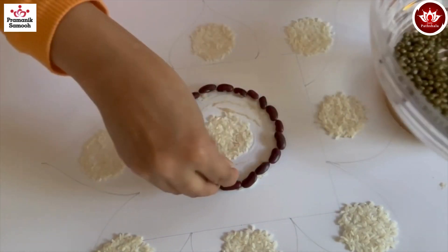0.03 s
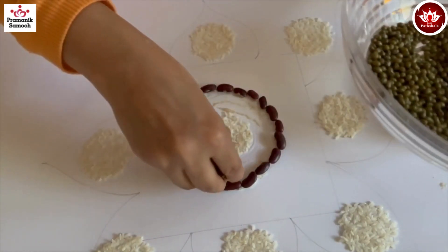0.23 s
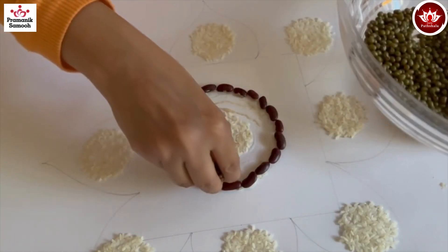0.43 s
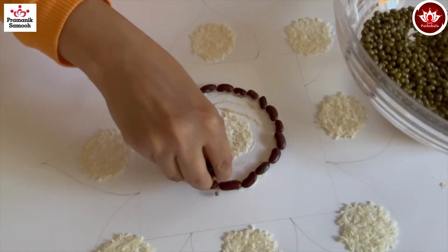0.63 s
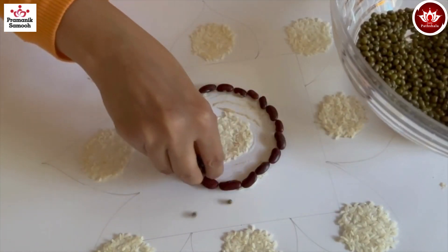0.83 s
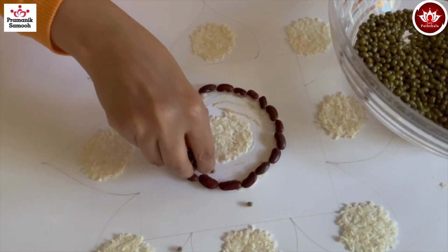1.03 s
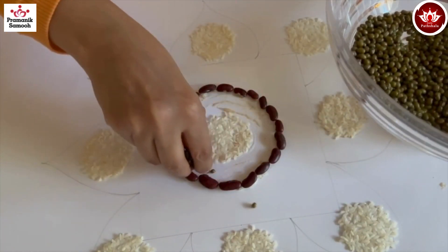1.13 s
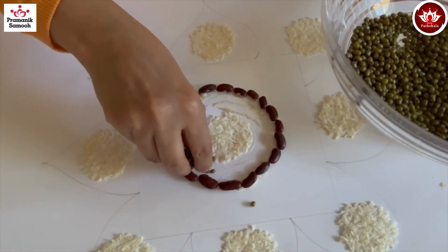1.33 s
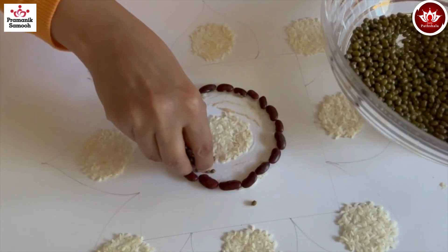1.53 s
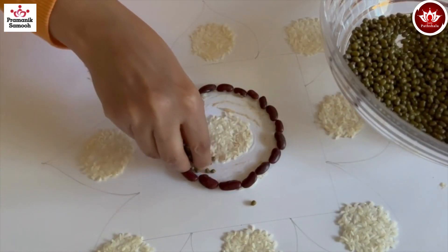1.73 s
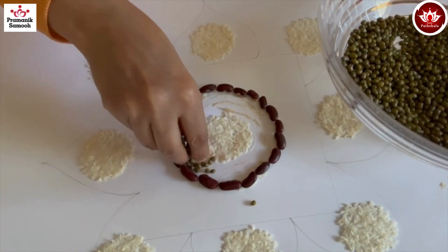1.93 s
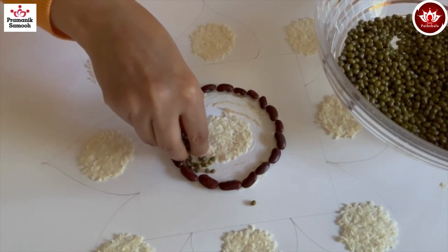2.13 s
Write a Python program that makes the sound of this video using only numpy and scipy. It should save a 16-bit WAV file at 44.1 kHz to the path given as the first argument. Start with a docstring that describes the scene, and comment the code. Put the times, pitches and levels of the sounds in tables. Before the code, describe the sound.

Dried beans rustle in a glass bowl as a hand scoops, then drop clicking onto a board

```python
"""A hand scoops dried beans in a glass bowl: they slide over one another in a swelling hiss, then settle.
Single beans then fall from the fingers onto a board, where they knock, bounce and click against their neighbours.
A small room with a low rumble."""
import sys
import numpy as np
from scipy import signal
from scipy.fft import rfft, irfft
from scipy.io import wavfile

SR = 44100
rng = np.random.default_rng(int(sys.argv[2]) if len(sys.argv) > 2 else 0)


def store_pcm(level_fs):
    """Save levels as 16-bit WAV."""
    pcm = np.round(np.clip(level_fs, -1, 1) * 32767).astype(np.int16)
    wavfile.write(sys.argv[1], SR, np.atleast_2d(pcm).T)


N = 97020

# how hard the beans slide in the bowl: (s, dB)
SLIDE = [(0, -44), (0.085, -57), (0.15, -41), (0.21, -41), (0.25, -37), (0.295, -28), (0.32, -35), (0.36, -26), (0.44, -30), (0.485, -22.5), (0.585, -21.5), (0.63, -28.5), (0.685, -33), (0.72, -31), (0.775, -37), (0.82, -32), (0.87, -46), (1.1, -90)]  # fixed
# how much the beans then shift against each other: (s, dB)
SHIFT = [(0.84, -58), (0.9, -32.5), (0.94, -43), (0.965, -38), (1.03, -35.5), (1.09, -50), (1.14, -37.5), (1.27, -36.5), (1.3, -42), (1.35, -32), (1.44, -39.5), (1.5, -50.5), (1.74, -42.5), (1.79, -34.5), (1.84, -68.5), (1.93, -63), (1.99, -38.5), (2.08, -72)]
# colour of rubbing beans: (Hz, dB per Hz)
SLIDE_COLOUR = [(150, -56), (400, -34), (1000, -22.5), (2000, -21.5), (3000, -13.5), (4500, -15), (6000, -11.5), (9700, -10), (11000, -2), (11600, 3), (12400, 2), (13000, 2), (13700, 3.5), (15600, -4), (16300, -54)]
SLIDE_DB, SLIDE_GRAINS_PER_S = -1, 3500  # grain rate at the height of the scoop
SHIFT_GRAINS_PER_S = 450  # fixed
GRAIN_SPREAD, CROWDING = 1.1, .5  # spread of grain sizes; how fast the rate falls with level
GRAIN_T60_S, GRAIN_SNAP = .007, 4.0  # fixed
CLUMP_DB, CLUMPS_PER_S = 1.5, 110  # beans slip in little bunches
# level of the bowl's ring: (s, dB)
BOWL = [(0, -63), (0.08, -71), (0.17, -61), (0.3, -54), (0.55, -51), (0.8, -72), (1.1, -110)]  # fixed
BOWL_HZ, BOWL_WIDTH_HZ = 3170, 270  # fixed
# a bean lands on the board: (s, click dB, knock dB)
DROPS = [(0.8358, -22.0, -40.0), (0.8689, -27.0, -45.0), (0.9658, -26.0, -38.0), (0.9734, -30.0, -37.0),
         (0.9935, -26.0, -39.0), (1.046, -17.0, -30.0), (1.1006, -12.0, -30.0), (1.1477, -21.0, -40.0),
         (1.176, -9.0, -24.0), (1.1819, -24.0, -39.0), (1.2357, -21.0, -33.0), (1.2562, -12.0, -31.0),
         (1.2634, -25.0, -38.0), (1.3089, -17.0, -34.0), (1.4269, -37.0, -39.0), (1.4332, -16.0, -32.0),
         (1.4471, -21.0, -38.0), (1.5463, -19.0, -28.0), (1.5735, -27.0, -44.0), (1.6078, -12.0, -32.0),
         (1.7188, -10.0, -30.0), (1.747, -10.0, -31.0), (1.7506, -17.0, -33.0), (1.7951, -28.0, -41.0),
         (1.8969, -19.0, -39.0), (1.9054, -20.0, -38.0), (1.9287, -17.0, -38.0), (1.9808, -27.0, -37.0)]  # fixed
# a bean clicks against another: (s, dB)
TICKS = [(0.03, -36.0), (0.1036, -35.0), (0.1277, -26.0), (0.1429, -31.0), (0.1539, -31.0), (0.1934, -30.0),
         (0.2015, -32.0), (0.2243, -26.0), (0.3323, -20.0), (0.3568, -19.0), (0.3992, -12.0), (0.4293, -12.0),
         (0.4619, -14.0), (0.6366, -18.0), (0.6556, -19.0), (0.6649, -18.0), (0.6984, -18.0), (0.7489, -20.0),
         (0.7654, -21.0), (0.7906, -21.0), (0.8229, -23.0), (0.8908, -17.0), (0.9025, -24.0), (0.9417, -27.0),
         (0.9588, -21.0), (1.006, -25.0), (1.022, -25.0), (1.0692, -25.0), (1.1583, -24.0), (1.211, -21.0),
         (1.2186, -18.0), (1.2724, -26.0), (1.2806, -25.0), (1.363, -22.0), (1.37, -21.0), (1.4061, -22.0),
         (1.4198, -26.0), (1.6201, -27.0), (1.8939, -21.0), (1.9455, -25.0), (1.9642, -29.0), (2.0212, -33.0)]  # fixed
# colours of the hard shell's click and of the board's knock: (Hz, dB per Hz)
CLICK_COLOUR = [(500, -55.5), (2000, -27), (4000, -18.5), (7200, -19.5), (7700, -15), (11000, -9.5), (11600, -1), (15300, -1.5), (16400, -32)]
KNOCK_COLOUR = [(150, -20), (450, -23), (800, -8), (1200, -3.5), (2000, 0), (3200, 7.5), (3800, -0.5), (5500, -1), (8000, -22)]
# colour of one bean on another, thinner than a landing: (Hz, dB per Hz)
TICK_COLOUR = [(500, -56), (2000, -30.5), (4000, -22), (7500, -17), (10000, -11.5), (11600, -0.5), (15300, -1.5), (16400, -17.5)]
DROP_DB, KNOCK_DB = 0.5, 1.5
TICK_DB, TICK_T60_S = 0.3, .006  # fixed
CLICK_T60_S, KNOCK_T60_S = .011, .012  # fixed
# first touch against the chatter after it
CLICK_SNAP, KNOCK_SNAP = 5.0, 13.0  # fixed
# one soft, dull bump: a few cycles that swell and fade
BUMP_S, BUMP_HZ, BUMP_WIDTH_S, BUMP_DB = .679, 546, 0.00096, -40
ROOM_T60_S, ROOM_GAP_S = .28, .004  # fixed
CLICK_ROOM_DB, KNOCK_ROOM_DB, TICK_ROOM_DB = -8.5, -10.5, -8  # fixed
SLIDE_ROOM_DB = -6.5
ECHOES_PER_S, ECHO_UNEVEN_DB = 350, 1  # reflections arrive in bunches
# the rumble eases off: (s, dB)
RUMBLE = [(0, -64.5), (0.3, -63.5), (0.8, -66.5), (1.4, -70), (2.2, -71)]
# colours of the rumble and of the faint hiss: (Hz, dB per Hz)
RUMBLE_COLOUR = [(20, -26), (40, -10), (65, 0), (100, 5.5), (125, 1), (190, -11.5), (400, -17), (1500, -34)]
FLOOR_COLOUR = [(100, 2.5), (400, 4.5), (1000, -1), (5000, 1), (15000, -8)]
FLOOR_DB = -66.5
CUTOFF_HZ = 17000  # fixed
TIME = np.arange(N) / SR


def from_db(db):
    """Decibels to gain."""
    return 10 ** (np.asarray(db) / 20)


def unit_energy(x):
    """Scaled to a total energy of 1."""
    return x / np.sqrt(np.sum(x ** 2) + 1e-20)


def rms_one(x):
    """Scaled to an rms of 1."""
    return unit_energy(x) * np.sqrt(len(x))


def in_time(curve):
    """A curve's value at every sample."""
    return np.interp(TIME, *np.transpose(curve))


def through(x, response):
    """A sound passed through an impulse response."""
    return signal.fftconvolve(x, response)[:len(x)]


def body(colour, size=2048):
    """Causal (minimum-phase) impulse response with the given spectrum."""
    hz, db = np.transpose(colour)
    grid = np.maximum(np.arange(size // 2 + 1) * SR / size, 1)
    cepstrum = irfft(np.log(from_db(np.interp(np.log(grid), np.log(hz), db))))
    cepstrum[1:size // 2] *= 2
    cepstrum[size // 2 + 1:] = 0
    return unit_energy(irfft(np.exp(rfft(cepstrum))))


def dying_noise(t60, size):
    """Noise that falls 60 dB in t60 seconds."""
    return rng.standard_normal(size) * np.exp(-np.log(1000) * TIME[:size] / t60)


def contact(t60, snap, size=2048):
    """One hard touch: a snap and a few milliseconds of chatter."""
    burst = dying_noise(t60, size)
    burst[0] = snap
    return unit_energy(burst)


def room_tail(size=14000):
    """The room's diffuse answer to a click at one spot; it starts just after the direct sound."""
    bunches = np.interp(TIME[:size] * ECHOES_PER_S, np.arange(size), rng.standard_normal(size))
    return unit_energy(dying_noise(ROOM_T60_S, size) * from_db(ECHO_UNEVEN_DB * bunches) * (TIME[:size] > ROOM_GAP_S))


def strikes(times, levels_db, colour, t60, snap, room_db):
    """A fresh contact and room tail at each time; the level is the energy spread over one millisecond."""
    direct, wet, response = np.zeros(N + SR), np.zeros(N + SR), body(colour)
    for s, db in zip(times, levels_db):
        hit, tail = unit_energy(through(contact(t60, snap), response)), room_tail()
        start, gain = int(s * SR), from_db(db) * np.sqrt(SR / 1000)  # fixed
        direct[start:start + len(hit)] += gain * hit
        wet[start:start + len(tail)] += gain * tail
    return direct[:N] + from_db(room_db) * through(wet[:N], response)


def grains(rate, count=16):
    """Random touches of many beans at the given rate, in little bunches; rms 1."""
    sizes = from_db(GRAIN_SPREAD * np.minimum(rng.exponential(1, N), 2)) * np.sign(rng.standard_normal(N))
    clumps = np.interp(TIME * CLUMPS_PER_S, np.arange(N), np.tanh(rng.standard_normal(N)))
    clicks = sizes * from_db(CLUMP_DB * clumps) * (rng.random(N) < rate / SR) / np.sqrt(rate)
    dealt = rng.integers(0, count, N)
    return rms_one(sum(through(clicks * (dealt == k), contact(GRAIN_T60_S, GRAIN_SNAP)) for k in range(count)))


def rustle(curve, top_rate):
    """The harder the beans move, the denser and louder their touches."""
    db = in_time(curve)
    rate = top_rate * from_db(CROWDING * np.maximum(db - db.max(), -20))
    return rms_one(through(grains(rate), body(SLIDE_COLOUR))) * from_db(db)


def bowl():
    """Beans brushing the glass keep one narrow resonance ringing."""
    peak = signal.iirpeak(BOWL_HZ, BOWL_HZ / BOWL_WIDTH_HZ, fs=SR)
    return rms_one(signal.lfilter(*peak, signal.lfilter(*peak, grains(SLIDE_GRAINS_PER_S)))) * from_db(in_time(BOWL))


def falling_beans():
    """Each landing is a bright click of the shell and a duller knock of the board."""
    s, click_db, knock_db = np.transpose(DROPS)
    return (strikes(s, click_db + DROP_DB, CLICK_COLOUR, CLICK_T60_S, CLICK_SNAP, CLICK_ROOM_DB)
            + strikes(s, knock_db + KNOCK_DB, KNOCK_COLOUR, KNOCK_T60_S, KNOCK_SNAP, KNOCK_ROOM_DB))


def ticking_beans():
    """Single beans that stand out of the rustle."""
    s, db = np.transpose(TICKS)
    return strikes(s, db + TICK_DB, TICK_COLOUR, TICK_T60_S, CLICK_SNAP, TICK_ROOM_DB)


def bump():
    """A soft, rounded bump."""
    age = TIME - BUMP_S
    return from_db(BUMP_DB) * np.sin(2 * np.pi * BUMP_HZ * age) * np.exp(-.5 * (age / BUMP_WIDTH_S) ** 2)


def room_tone():
    """Low rumble and faint hiss."""
    rumble, hiss = (rms_one(through(rng.standard_normal(N + SR), body(c, size=8192))[SR:]) for c in (RUMBLE_COLOUR, FLOOR_COLOUR))
    return from_db(in_time(RUMBLE)) * rumble + from_db(FLOOR_DB) * hiss


def scene():
    """The scoop, then single beans, heard in the room."""
    handling = from_db(SLIDE_DB) * rustle(SLIDE, SLIDE_GRAINS_PER_S) + rustle(SHIFT, SHIFT_GRAINS_PER_S) + bowl() + bump()
    wet = from_db(SLIDE_ROOM_DB) * through(handling, room_tail())
    return (handling + wet + falling_beans() + ticking_beans() + room_tone())[None]


def record(dry):
    """The top of the treble is cut steeply."""
    return signal.sosfilt(signal.cheby2(16, 60, CUTOFF_HZ, fs=SR, output="sos"), dry)  # fixed


dry = scene()
out = record(dry)
store_pcm(out)
```